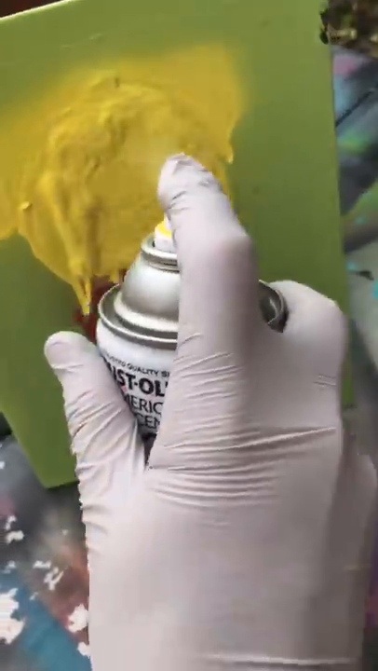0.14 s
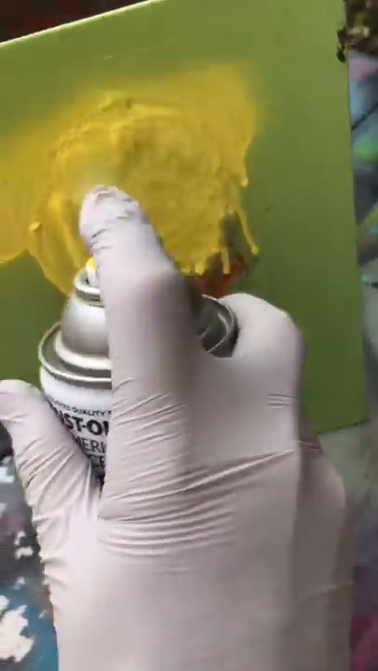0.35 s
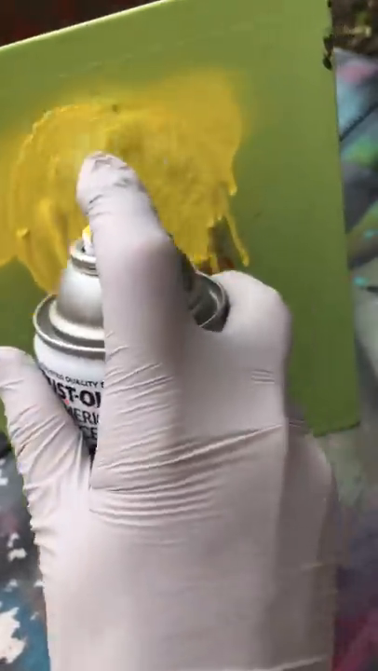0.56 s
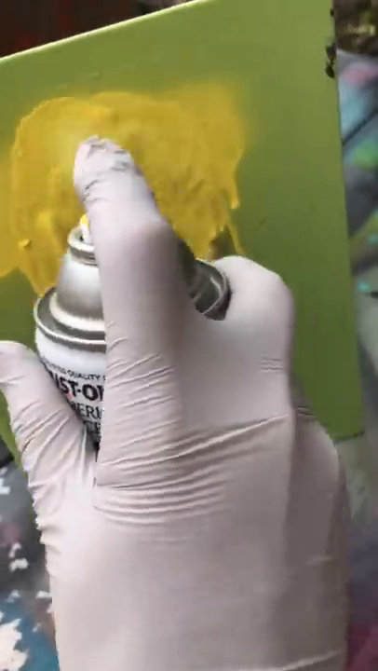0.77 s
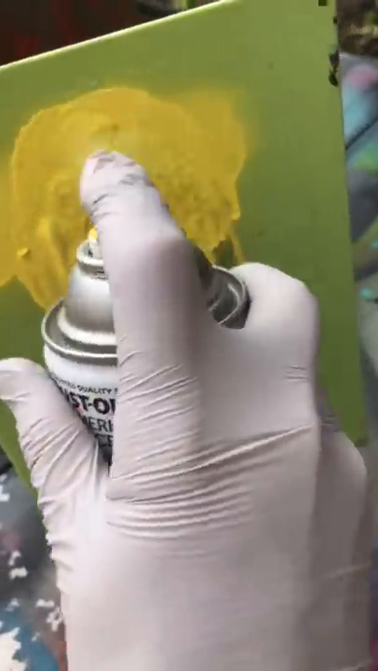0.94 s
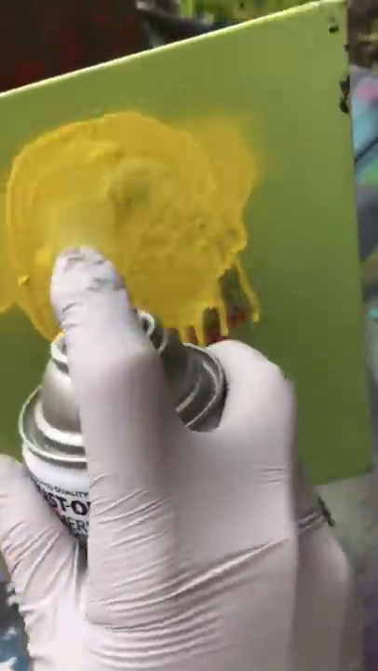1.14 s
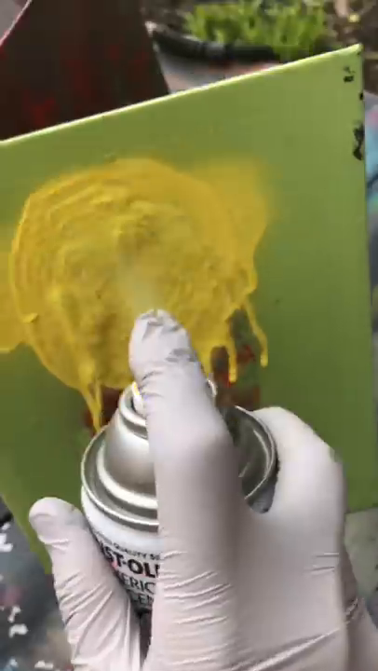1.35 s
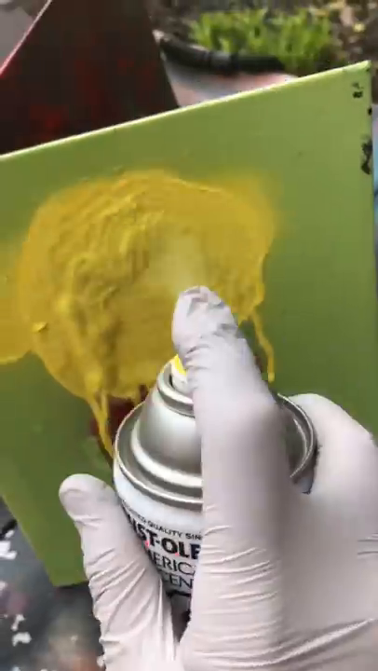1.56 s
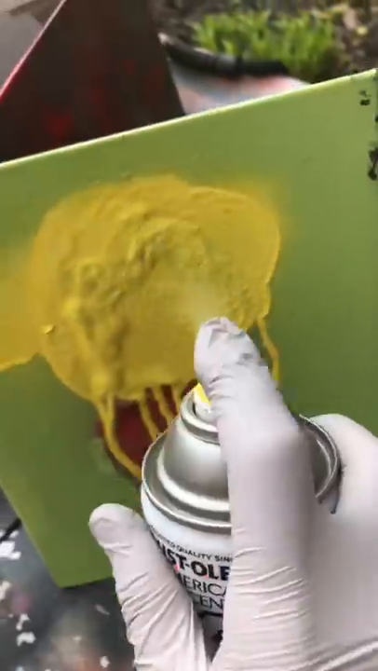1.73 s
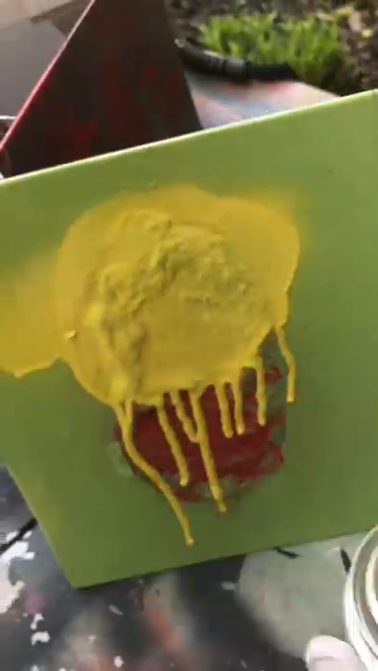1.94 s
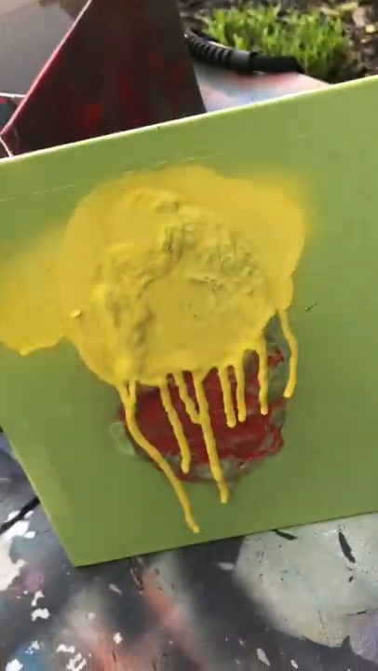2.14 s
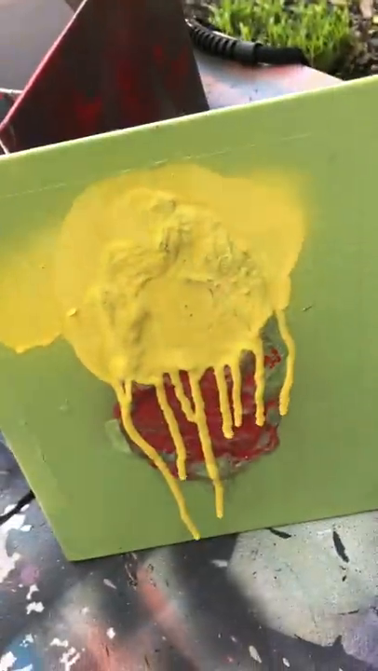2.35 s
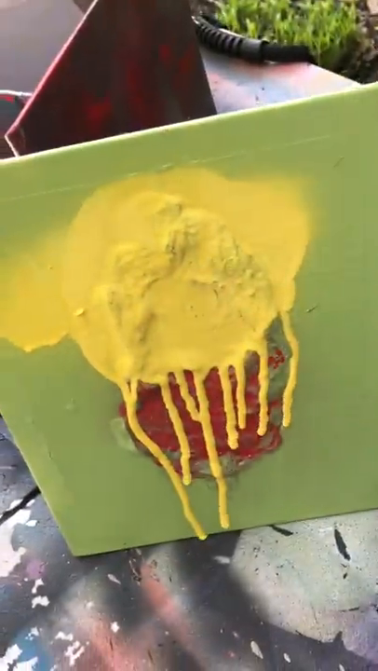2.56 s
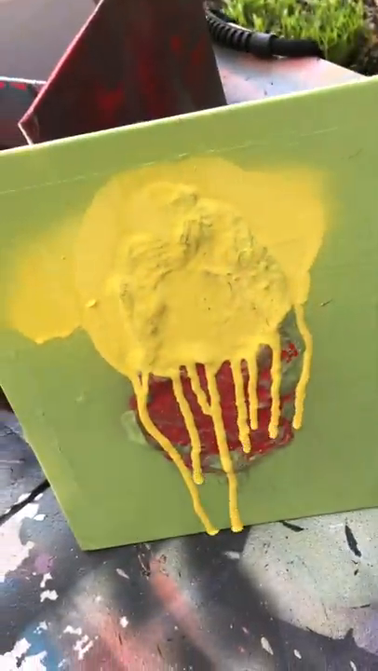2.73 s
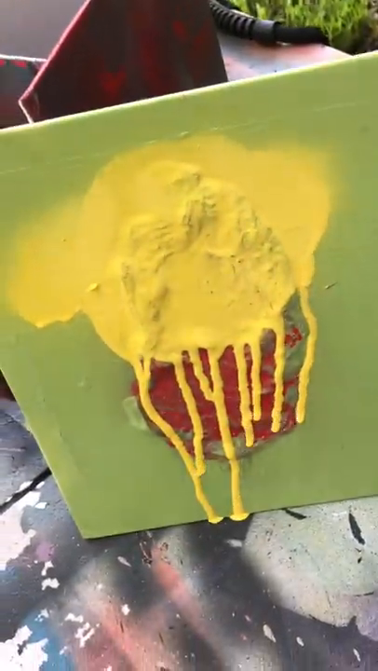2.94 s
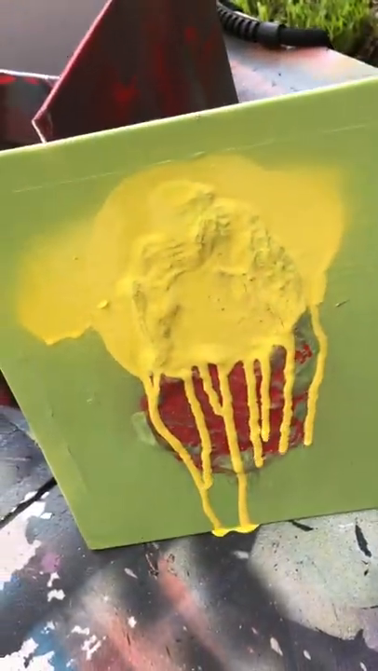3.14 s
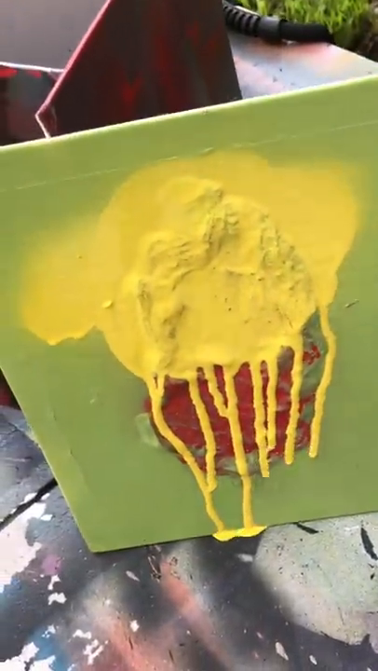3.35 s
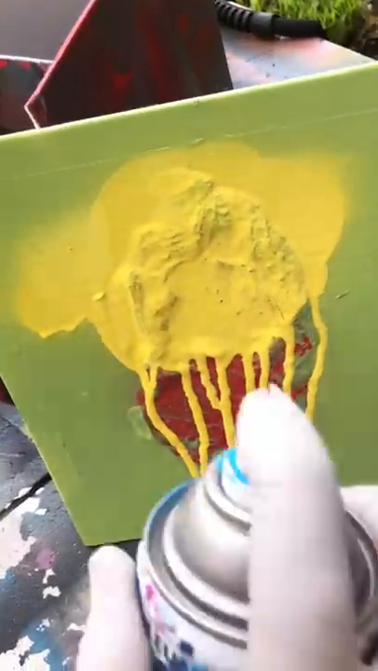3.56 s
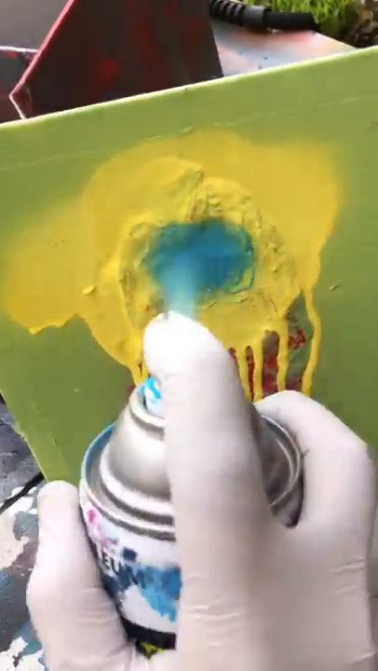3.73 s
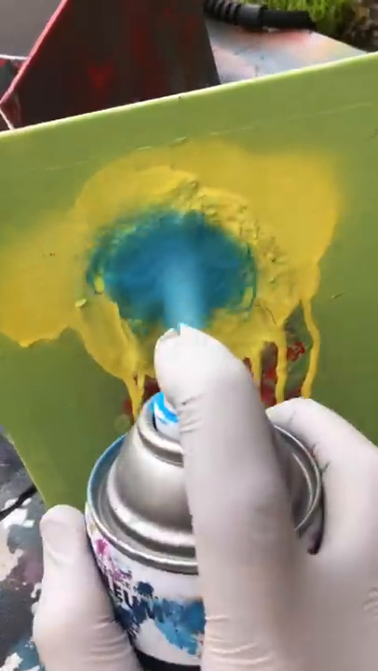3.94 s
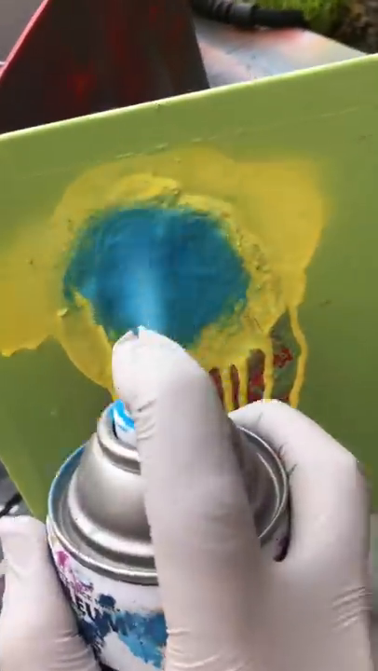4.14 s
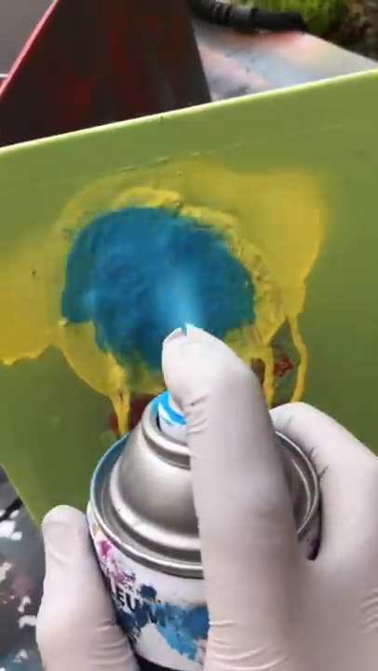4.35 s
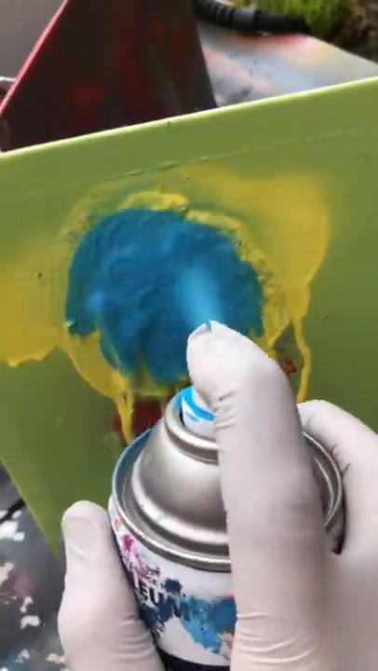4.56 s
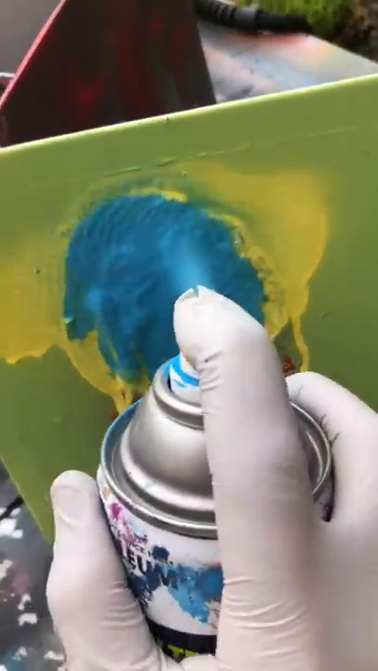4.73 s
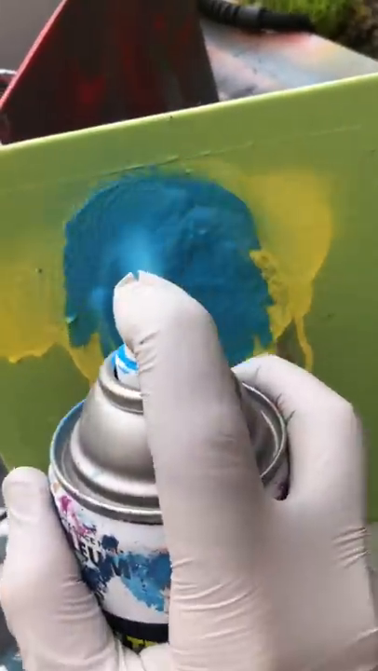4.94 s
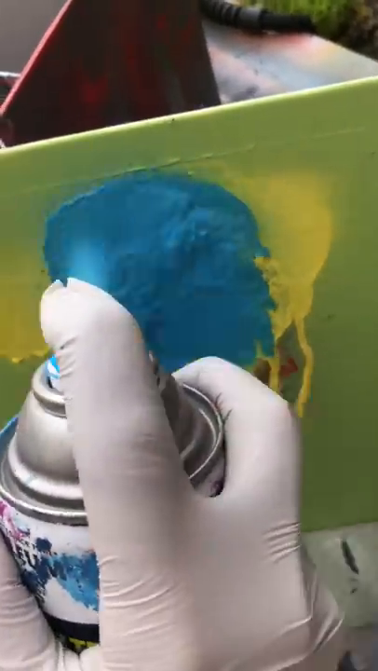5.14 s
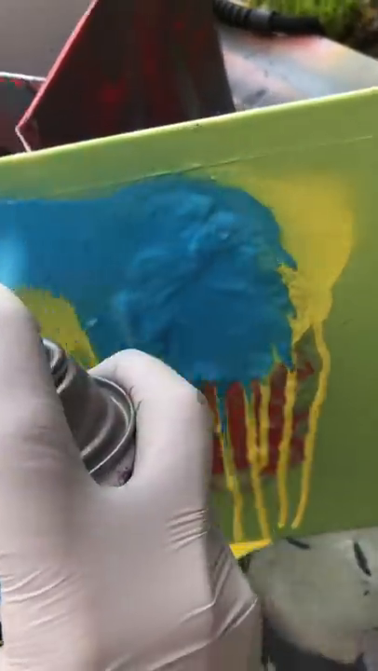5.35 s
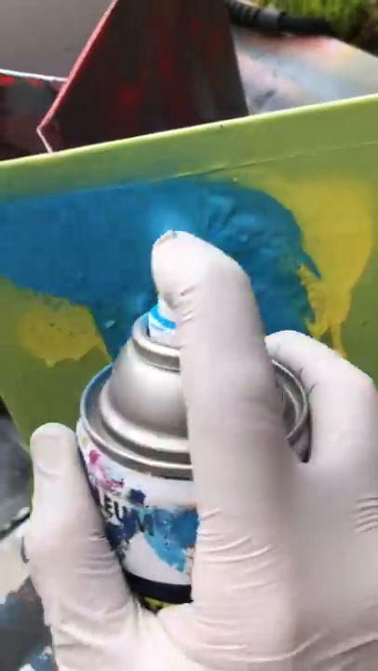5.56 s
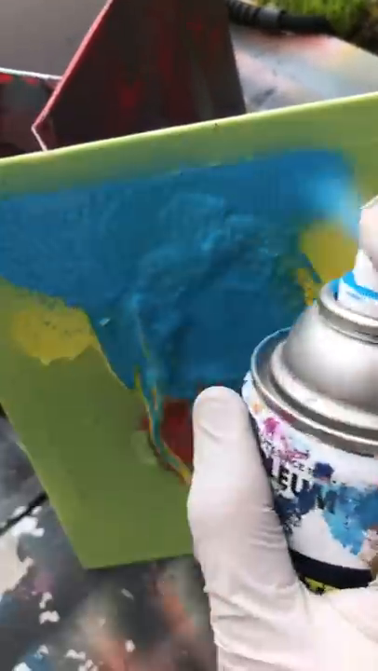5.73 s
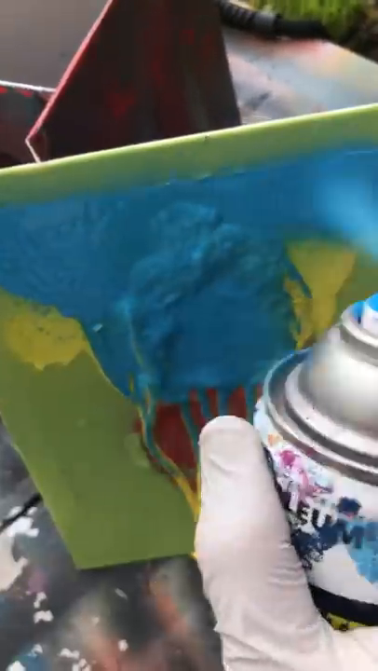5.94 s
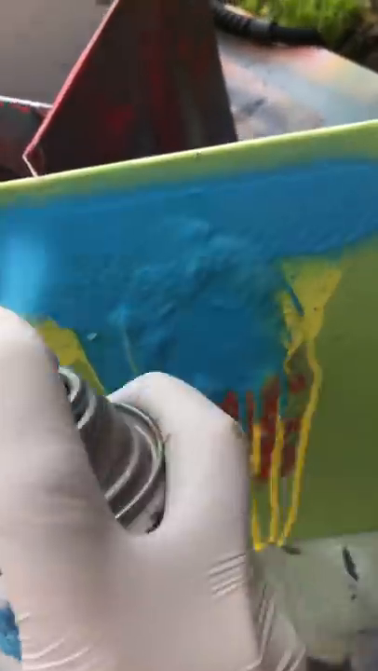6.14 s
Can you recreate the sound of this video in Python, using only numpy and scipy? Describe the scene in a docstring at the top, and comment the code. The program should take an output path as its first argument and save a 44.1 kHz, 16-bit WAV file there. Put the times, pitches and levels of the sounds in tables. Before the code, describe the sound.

A bright, dense spray hiss with shifting hollow echoes from a nearby board runs first and shuts quickly. A tinny clack, low wooden thuds, rapid ball ticks and thin rubber rustles fill the pause, with faint birdsong, low traffic rumble and a weak machine hum behind. After small plastic clicks, another can sprays continuously, slightly softer, close and dry outdoors.

```python
"""Outdoors, close to a mono microphone: two spray cans are used one after the other on a small board.
Valve-gated noise makes jet and paint splash; short moving delays echo them off board and can.
The first can is set down on a hollow bench, rattles its mixing ball and rocks: struck and rubbed modes.
Noise snaps make the dying treble hiss as the first valve shuts, then rustling gloves; birds whistle far
off (gliding sines), traffic rumbles (noise), a machine hums (wavering sines)."""
import sys
import numpy as np
from scipy import signal
from scipy.fft import rfft, irfft
from scipy.io import wavfile
from scipy.ndimage import map_coordinates

SR = 44100
rng = np.random.default_rng(int(sys.argv[2]) if len(sys.argv) > 2 else 0)


def log_audio(samples):
    """Write samples as a 16-bit WAV file to the path given in sys.argv[1]."""
    # one column per channel
    frames = np.atleast_2d(samples).T
    # limit to full scale, then quantise
    limited = np.clip(frames, -1, 1)
    pcm = np.round(limited * 32767).astype(np.int16)
    wavfile.write(sys.argv[1], SR, pcm)


N = 272979
T_S = np.arange(N) / SR


def from_db(db):
    """Gain of a level in dB."""
    return 10 ** (np.asarray(db) / 20)


def rms_one(x):
    """Scaled to unit power."""
    return x / np.sqrt(np.mean(x ** 2) + 1e-20)


def in_time(rows):
    """Columns joined by straight lines, one value a sample."""
    s, *columns = np.transpose(rows)
    return [np.interp(T_S, s, c) for c in columns]


def drift(rate_hz):
    """Random wander of unit rms: noise through two equal poles at rate_hz, run at SR / 40."""
    r = np.exp(-80 * np.pi * rate_hz / SR)
    noise = rng.standard_normal(N // 40 + 2002)
    slow = signal.lfilter([1], [1, -2 * r, r * r], noise)[2000:]
    return np.interp(np.arange(N) / 40, np.arange(len(slow)), rms_one(slow))


def coloured(x, spectrum):
    """Shaped to a spectrum, straight in dB over log frequency; unit power."""
    hz, db = np.transpose(spectrum)
    grid_hz = np.arange(1, N // 2 + 2) * SR / N
    gain = from_db(np.interp(np.log(grid_hz), np.log(hz), db))
    return rms_one(irfft(rfft(x) * gain, N))


def tilted(x, slope):
    """Gain that follows a power of frequency, 1 at 10 kHz, flat below 5.3 kHz."""
    hz = np.maximum(np.arange(N // 2 + 1) * SR / N, 5300)
    return irfft(rfft(x) * (hz / 10000) ** slope, N)


def resonance(x, hz, width_hz):
    """Two-pole band with gain 1 on top."""
    r = np.exp(-np.pi * width_hz / SR)
    poles = [1, -2 * r * np.cos(2 * np.pi * hz / SR), r * r]
    return signal.lfilter([(1 - r * r) / 2, 0, (r * r - 1) / 2], poles, x)


def swells(rows):
    """Bell-shaped gains, summed."""
    return sum(from_db(db) * np.exp(-((T_S - s) / half_s) ** 2) for s, half_s, db in rows)


def impulses(times_s, level_db):
    """One click per event over a floor that keeps the filters off denormals."""
    clicks = np.full(N, 1e-18)
    clicks[np.round(np.asarray(times_s) * SR).astype(int)] = from_db(level_db)
    return clicks


def struck(times_s, peak_db, modes, spread_db, contact_ms):
    """Each blow, a rounded push, excites every mode by a random share; neighbour modes start opposed."""
    out = np.zeros(N)
    chance = rng.standard_normal((len(times_s), len(modes)))
    for k, (hz, level_db, t60_s) in enumerate(modes):
        clicks = impulses(times_s, peak_db + level_db + spread_db * chance[:, k])
        r, w = from_db(-60 / (t60_s * SR)), 2 * np.pi * hz / SR
        out += (-1) ** k * signal.lfilter([0, np.sin(w)], [1, -2 * r * np.cos(w), r * r], clicks)
    soft = np.exp(-1000 / (contact_ms * SR))
    return signal.lfilter([(1 - soft) ** 2], [1, -2 * soft, soft * soft], out)


def crack(times_s, level_db, decay_ms):
    """Puff of noise above 1.5 kHz at each contact, decaying exponentially."""
    envelope = signal.lfilter([1], [1, -np.exp(-1000 / (decay_ms * SR))], impulses(times_s, level_db))
    puff = envelope * rng.standard_normal(N)
    return signal.sosfilt(signal.butter(2, 1500, "high", fs=SR, output="sos"), puff)


def delayed(x, lag_ms):
    """Read back a moving fraction of a millisecond late."""
    return map_coordinates(x, [np.arange(N) - lag_ms * SR / 1000], order=5)


# rumble spectrum: f/Hz, relative level/dB
TRAFFIC_SPECTRUM = [(15, -57), (25, -3), (80, -0.5), (157, -0.5), (301, -11), (489, -13.5), (531, -15),
                    (677, -18.5), (1560, -30.5), (2690, -38.5), (3160, -34.5), (6740, -40), (16000, -43)]


def traffic():
    """Coloured noise whose level swells slowly."""
    return from_db(-46 + 0.6 * drift(0.5)) * coloured(rng.standard_normal(N), TRAFFIC_SPECTRUM)


# machine tones: f/Hz, typical rms level/dB
HUM_TONES = [(490, -62), (608, -68), (679, -70)]


def machine_hum():
    """Faint sines that waver in level and pitch."""
    out = np.zeros(N)
    for hz, db in HUM_TONES:
        gain = np.sqrt(2) * from_db(db + 2.0 * drift(1.5))
        out += gain * np.sin(2 * np.pi * np.cumsum(hz + 1.75 * drift(1.75)) / SR)
    return out


# whistles: start/s, length/s, first f/Hz, last f/Hz, mid arch/Hz, level/dB
BIRD_WHISTLES = [(1.875, .17, 2320, 2300, 440, -53), (2.03, .05, 2600, 2700, 0, -61),
                 (2.04, .07, 2050, 1850, 0, -67), (2.18, .075, 2520, 2800, 0, -50),
                 (2.48, .18, 2300, 1950, 0, -72), (2.79, .3, 3230, 2460, 0, -68),
                 (2.78, .15, 2900, 2330, -230, -62), (2.9, .28, 2330, 1640, 110, -66)]
# farther birds blurred by echoes: t/s, level/dB
BIRD_CHORUS = [(1.84, -61), (2.0, -65), (2.2, -59), (2.45, -63), (2.7, -67), (2.95, -63), (3.3, -69)]


def birds():
    """Wavering sines glide along an arch, smeared by many late echoes, over a chorus of band noise."""
    near = np.zeros(N)
    for s, length_s, first_hz, last_hz, arch_hz, db in BIRD_WHISTLES:
        u = np.clip((T_S - s) / length_s, 0, 1)
        hump = 4 * u * (1 - u)
        hz = (first_hz + (last_hz - first_hz) * u + arch_hz * hump) * (1 + 0.008 * drift(40))
        gain = np.sqrt(2) * from_db(db + 2.5 * drift(30.5)) * hump ** .4
        near += gain * np.sin(2 * np.pi * np.cumsum(hz) / SR)
    lag_s = np.arange(SR // 2) / SR
    scatter = rng.standard_normal(len(lag_s)) * from_db(-39 - 60 * lag_s / .9)  # t60 0.9 s
    echoes = signal.fftconvolve(near, scatter)[:N]
    blur = resonance(resonance(rng.standard_normal(N), 2600, 900), 2600, 900)
    return near + echoes + from_db(in_time(BIRD_CHORUS)[0]) * rms_one(blur)


# first row the dying treble hiss as the first valve shuts, the others glove rustles:
# middle t/s, half length/s, level/dB
SHUTOFF_AND_RUSTLES = [(1.82, .035, -53), (1.968, .012, -59), (2.458, .01, -59), (2.585, .015, -62),
                       (2.655, .028, -55), (2.745, .015, -58), (2.785, .008, -54), (2.895, .035, -57),
                       (3.054, .012, -48), (3.105, .016, -53), (3.185, .025, -61), (3.25, .014, -44),
                       (3.4, .03, -64), (3.475, .012, -56), (3.53, .035, -60)]
# spectrum of both: f/Hz, relative level per Hz/dB
TREBLE_SPECTRUM = [(1500, -21), (2500, -8), (4000, -5), (6000, 4), (9000, -0.5), (16000, -0.5)]


def shutoff_and_gloves():
    """Noise of random exponential level in dB: dying hiss of the first valve, then creasing thin rubber."""
    snaps = rng.standard_normal(N) * from_db(3.5 * rng.exponential(1, N) + 1.7 * drift(41))
    rest_db = -75
    return (swells(SHUTOFF_AND_RUSTLES) + from_db(rest_db)) * coloured(snaps, TREBLE_SPECTRUM)


# hollow bench modes, also struck by the knocks: f/Hz, relative level/dB, t60/s
BENCH_MODES = [(110, -5, 0.11), (138.4, -1, 0.19), (168.8, 0.5, 0.12), (202.4, -1.5, .12), (249.6, -6, .1),
               (304, -6.5, 0.11), (376, -11.5, 0.038), (438, -9.5, 0.068), (522, -12, 0.103),
               (582, -9, 0.067), (650, -16, 0.13), (766, -15, 0.11), (933, -18, 0.082)]
# the can rocks on the bench: middle t/s, half length/s, level/dB
ROCKING_SWELLS = [(2.2, .03, -40), (2.345, .025, -42), (2.39, .03, -45), (2.47, .03, -40),
                  (2.55, .045, -39), (2.64, .045, -42), (2.73, .04, -50), (2.83, .04, -50)]


def rocking():
    """Rubs the bench modes with low noise, without a clear blow."""
    noise = signal.sosfilt(signal.butter(2, 450, fs=SR, output="sos"), rng.standard_normal(N))
    rubbed = sum(from_db(db) * resonance(noise, hz, 0.73 / t60_s) for hz, db, t60_s in BENCH_MODES)
    return swells(ROCKING_SWELLS) * rms_one(rubbed)


# can bottom on the bench: t/s, nominal crack level/dB, thud re crack/dB
BENCH_KNOCKS = [(2.1156, -7.5, -1.5), (2.1243, -18, -16), (2.1463, -21.5, 2.5), (2.3308, -31.5, 0),
                (2.4222, -48, 7), (2.444, -21, -1.5), (2.5145, -38.5, 7.5), (2.5224, -26, 0.5),
                (2.5838, -21.5, -7), (2.6123, -39, 9), (2.6368, -38, 5), (2.7065, -37, 2),
                (3.3357, -28, -23)]
# can rim modes: f/Hz, relative level/dB, t60/s
RIM_MODES = [(1060, -6.5, 0.022), (1290, -10, 0.019), (1620, -14, 0.014), (1870, -15.5, 0.023),
             (2910, -4, 0.017), (3200, -4, 0.023), (3490, -2, 0.011), (3940, -5, 0.0086),
             (4330, -11.5, 0.013), (5250, -12, 0.015)]


def bench_knocks():
    """Each contact rings the bench as a thud and the rim as a bright crack."""
    times_s, crack_db, thud_db = np.array(BENCH_KNOCKS).T
    thud = struck(times_s, crack_db + thud_db - 4, BENCH_MODES, spread_db=4.5, contact_ms=0.035)
    rim = struck(times_s, crack_db - 3, RIM_MODES, spread_db=2.5, contact_ms=0.035)
    return thud + rim


# mixing ball: first touch t/s, nominal level/dB, loss per bounce/dB
BALL_BOUNCES = [(2.177, -27, 1.1), (3.3369, -28, 7)]


def bounces(count):
    """The ball bounces to rest: each gap is a fixed share of the one before."""
    first_gap_s, gap_ratio = .0235, .92
    k = np.arange(count)
    after_s = first_gap_s * (1 - gap_ratio ** k) / (1 - gap_ratio)
    return [row for s, db, loss_db in BALL_BOUNCES for row in zip(s + after_s, db - loss_db * k)]


# single ticks on the can wall: t/s, nominal level/dB
WALL_TICKS = [(2.1155, -25), (2.1327, -32), (2.141, -24), (2.1464, -25), (2.2726, -28), (3.3049, -56),
              (3.4266, -54), (3.48, -50), (3.5084, -46)]
# can wall modes, ringing free: f/Hz, relative level/dB, t60/s
CAN_MODES = [(3100, -15, .025), (4020, -16, .03), (4250, -13, .05), (4370, -14, .04), (5170, -19, .03),
             (6340, -15, .06), (6480, -17, .05), (7270, -11, .035), (8320, -17, .03), (8840, -12, .03),
             (9300, -17, .03), (10500, -14, .025), (12020, -13, .02), (12470, -14, .02), (13900, -16, .015)]


def can_ticks():
    """Single ticks and ball bounces ring the tin wall; a grip shortens the second can's ring."""
    held_from_s, held_ring_ratio = 3, .6
    times_s, level_db = np.array(list(WALL_TICKS) + bounces(count=11)).T
    held = times_s > held_from_s
    held_modes = np.array(CAN_MODES) * [1, 1, held_ring_ratio]
    free_ring = struck(times_s[~held], level_db[~held] - 2, CAN_MODES, spread_db=5.0, contact_ms=0.024)
    held_ring = struck(times_s[held], level_db[held] - 3, held_modes, spread_db=5.0, contact_ms=0.024)
    return free_ring + held_ring + crack(times_s, level_db - 1.5, decay_ms=1.35)


# the plastic nozzle gives under the finger: t/s, nominal level/dB
FINGER_CLICKS = [(3.496, -60), (3.5094, -44), (3.5414, -35), (3.5695, -14.5), (3.583, -24)]
# nozzle modes: f/Hz, relative level/dB, t60/s
NOZZLE_MODES = [(1640, -7, 0.0071), (2500, 3.5, 0.0096), (3700, -1, 0.0053), (5070, 0, 0.013),
                (7000, -5, .008)]


def nozzle_clicks():
    """Short plastic modes with a puff of noise."""
    times_s, level_db = np.array(FINGER_CLICKS).T
    ring = struck(times_s, level_db - 3, NOZZLE_MODES, spread_db=1, contact_ms=0.029)
    return ring + crack(times_s, level_db - 3.5, decay_ms=1.0)


def valve(pressed_s, let_go_s, paint_s):
    """Flow 0-1: ramps up and down, weaker until the paint follows the gas."""
    open_s, shut_s, gas_only_db = .022, .037, -4
    flow = np.clip(np.minimum((T_S - pressed_s) / open_s, 1 - (T_S - let_go_s) / shut_s), 0, 1)
    return flow * np.where(T_S < paint_s, from_db(gas_only_db), 1)


# finger on each valve, jet and splash alike: pressed t/s, let go t/s, paint t/s, splash level/dB
VALVE_TIMES = [(-1, 1.772, -1, -41.5), (3.568, 7, 3.638, -41)]
# one spectrum per paint: f/Hz, relative level per Hz/dB
SPLASH_SPECTRA = [
    [(410, -36), (700, -12), (1310, -9), (1660, -3), (1850, -11), (2520, 1), (2760, -5.5), (3440, -2.5),
     (4170, -6.5), (4480, -18), (4700, -13.5), (6110, -22), (10300, -120)],
    [(410, -39), (700, -12), (1400, -4.5), (1570, -4), (1820, -7.5), (2330, -3.5), (2590, -10), (2780, -5),
     (3360, 0.5), (4240, -3.5), (4700, -8.5), (6110, -45), (10300, -120)],
]
# echo of the splash off each can: strength 0-1
SPLASH_ECHO_GAINS = [.15, .45]
# hollow colour while the jet sweeps to the board edge: middle t/s, half length/s, level/dB
HOLLOW_SWELLS = [(5.3, .25, -50.5)]


def splash(lag_ms):
    """Paint patters on the wet board: fluttering noise, echoed off the can, with a hollow band."""
    flight_s, spurt_db, spurt_s, lag_ratio = .006, 6, .025, 1.07
    hollow_hz, hollow_width_hz = 3680, 480
    patter = from_db(0.49 * drift(100) + 0.6 * drift(7.8)) * rng.standard_normal(N)
    wet = np.zeros(N)
    for (on, off, paint, db), spectrum, back in zip(VALVE_TIMES, SPLASH_SPECTRA, SPLASH_ECHO_GAINS):
        first_spurt_db = spurt_db * np.exp(-((T_S - paint - flight_s) / spurt_s) ** 2)
        flow = valve(on, off + flight_s, paint)
        direct = from_db(db + first_spurt_db) * flow * coloured(patter, spectrum)
        wet += direct + back * delayed(direct, lag_ratio * lag_ms)
    hollow = resonance(resonance(patter, hollow_hz, hollow_width_hz), hollow_hz, hollow_width_hz)
    return wet + swells(HOLLOW_SWELLS) * rms_one(hollow)


# one spectrum per nozzle: f/Hz, relative level per Hz/dB
JET_SPECTRA = [
    [(2710, -36), (4600, -21), (5580, -10.5), (7020, -4.5), (8080, -3), (12300, -2.5), (14900, 1.5),
     (16000, -8)],
    [(2710, -37), (4600, -19), (5790, -5), (7710, -2), (12300, -1.5), (13400, -1.5), (15100, 3),
     (16000, -7)],
]
# hiss as the nozzle turns, at full flow: t/s, level/dB
HISS_LEVEL = [(0, -18.5), (.1, -19.5), (.3, -19), (.9, -19), (1.2, -17.5), (1.8, -17.5), (3.6, -20.5),
              (4.87, -21), (5.4, -23.5), (5.5, -22), (5.79, -25.5), (6.01, -22), (6.16, -24.5)]


def jet_hiss():
    """Turbulent noise, fluttering as droplets tear off, gated by each valve."""
    tearing = from_db(0.63 * drift(200) + .45 * drift(25)) * rng.standard_normal(N)
    hiss = np.zeros(N)
    for (on, off, paint, _), spectrum in zip(VALVE_TIMES, JET_SPECTRA):
        hiss += valve(on, off, paint) * coloured(tearing, spectrum)
    return from_db(in_time(HISS_LEVEL)[0]) * hiss


# t/s, face echo 0-1, inverted edge wave 0-1, its further lag/ms, face and edge in turn 0-1
ECHO_STRENGTH = [(0, .56, 0, .18, 0), (1.1, .56, .13, .175, .05), (1.35, .63, .23, .18, 0),
                 (1.8, .57, .03, .165, 0), (3.58, .4, .14, .183, 0), (3.8, .51, .22, .187, 0),
                 (4.6, .55, .24, .189, .14), (4.85, .52, .33, .172, .07), (5.05, .42, .43, .169, .18),
                 (5.3, .34, .3, .168, .2), (5.5, .3, .44, .167, 0), (5.7, .42, .26, .196, .09),
                 (5.9, .3, .14, .226, 0), (6.19, .2, 0, .2, 0)]


def echoed(hiss, lag_ms):
    """Close echoes carve moving notches; the board returns short waves best, long ones bend round the can."""
    shoulder, shoulder_ms, shortcut_ms = .3, .125, .026  # the double path is shorter than its lags summed
    face, edge, further_ms, twice = in_time(ECHO_STRENGTH)
    echoes = face * delayed(tilted(hiss, .23), lag_ms)
    echoes -= edge * delayed(tilted(hiss, .45), lag_ms + further_ms)
    echoes += shoulder * edge * delayed(tilted(hiss, -2.6), lag_ms + shoulder_ms)  # off the can shoulder
    echoes += twice * delayed(hiss, 2 * lag_ms + further_ms - shortcut_ms)
    return (hiss + echoes) / np.sqrt(1 + face ** 2 + edge ** 2)


# the hand moves: t/s, board echo lag/ms
ECHO_LAG = [(0, .452), (.12, .407), (.27, .377), (.41, .403), (.5, .375), (.59, .387), (.67, .367),
            (.76, .378), (.86, .354), (.94, .371), (1.04, .351), (1.12, .372), (1.24, .348), (1.51, .351),
            (1.64, .323), (1.79, .346), (3.58, .44), (3.65, .393), (3.73, .367), (3.87, .393), (4, .374),
            (4.1, .379), (4.2, .365), (4.38, .355), (4.64, .359), (4.77, .343), (4.99, .327), (5.25, .32),
            (5.45, .299), (5.6, .289), (5.72, .323), (5.87, .37), (5.95, .39), (6.19, .432)]


def spray():
    """Echoed jet hiss plus paint splash, sharing one moving board distance."""
    lag_ms = in_time(ECHO_LAG)[0]
    return echoed(jet_hiss(), lag_ms) + splash(lag_ms)


def scene():
    """One microphone feeds both channels."""
    background = traffic() + machine_hum() + birds()
    handling = shutoff_and_gloves() + rocking() + bench_knocks() + can_ticks() + nozzle_clicks()
    return np.tile(background + handling + spray(), (2, 1))


def low_pass(x):
    """Removes everything above the highest recorded frequency."""
    return signal.sosfilt(signal.butter(12, 17070, fs=SR, output="sos"), x)


def record(dry):
    """The microphone path cuts the deepest bass below 49 Hz and the top, 50 dB down from 16170 Hz."""
    no_bass = signal.sosfilt(signal.butter(4, 49, "high", fs=SR, output="sos"), dry)
    mix = signal.sosfilt(signal.cheby2(16, 50, 16170, fs=SR, output="sos"), no_bass)
    return low_pass(mix)


dry = scene()
out = record(dry)
log_audio(out)
```